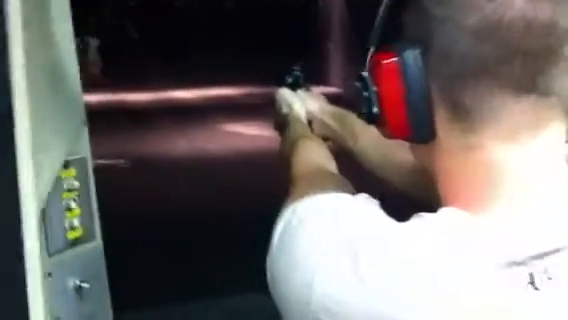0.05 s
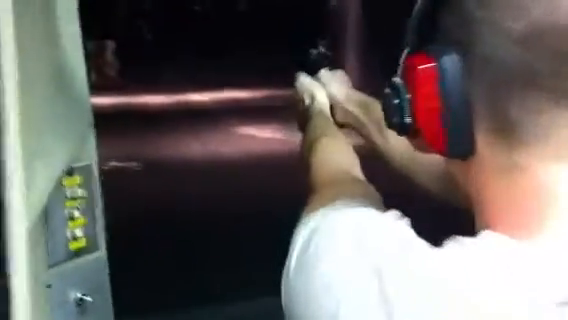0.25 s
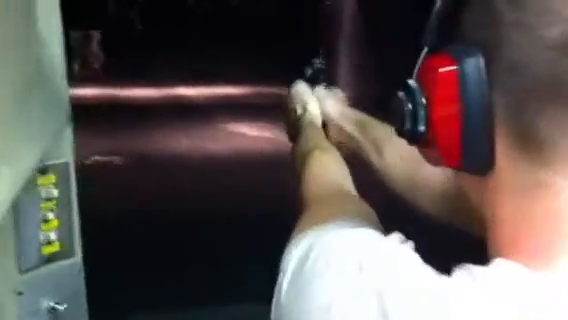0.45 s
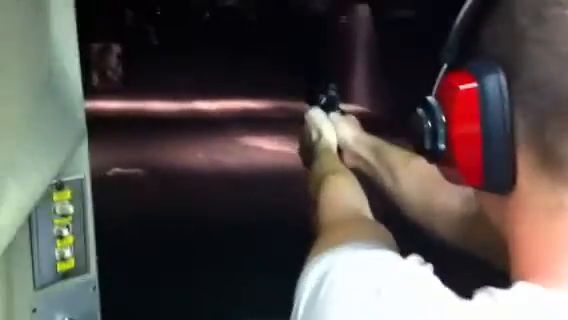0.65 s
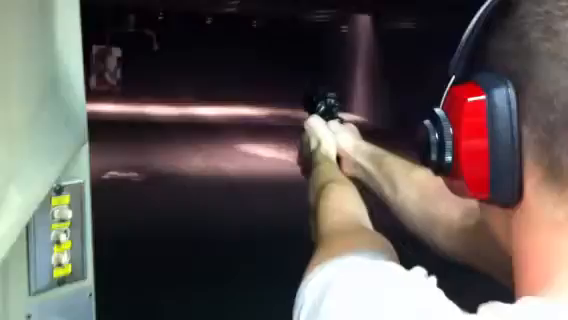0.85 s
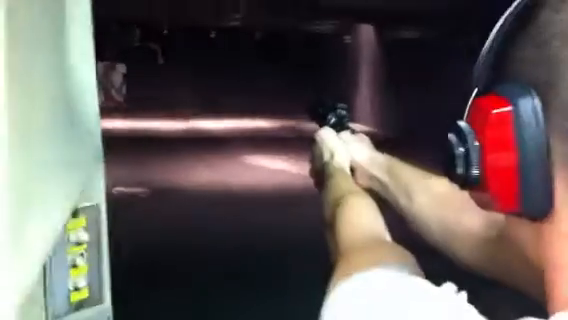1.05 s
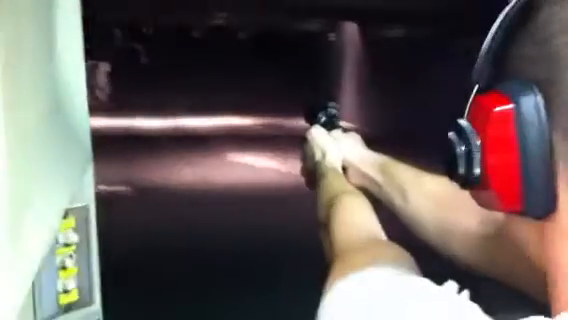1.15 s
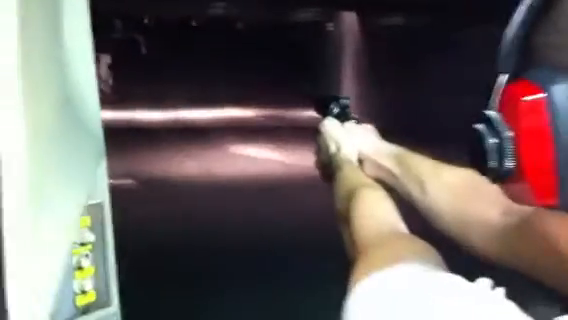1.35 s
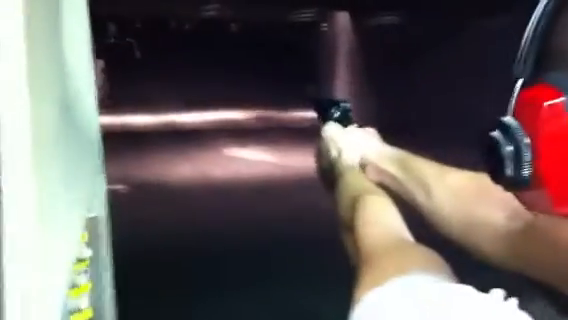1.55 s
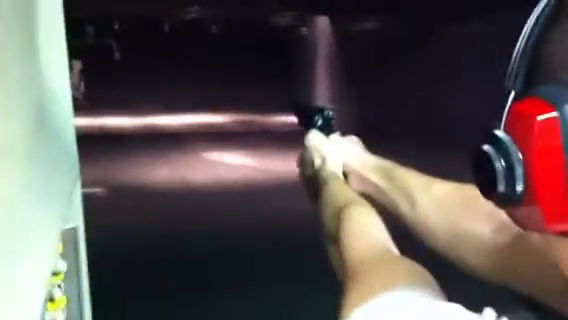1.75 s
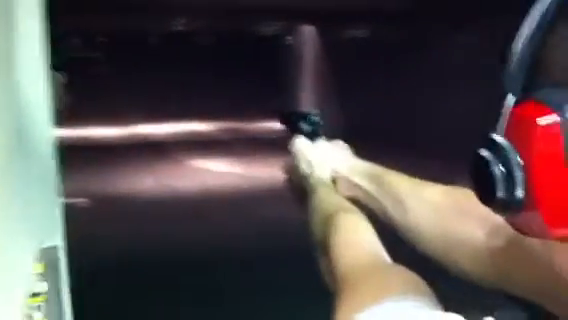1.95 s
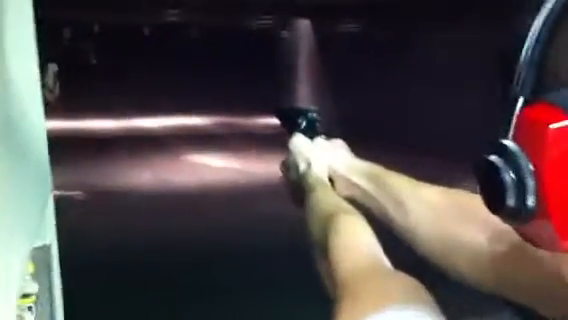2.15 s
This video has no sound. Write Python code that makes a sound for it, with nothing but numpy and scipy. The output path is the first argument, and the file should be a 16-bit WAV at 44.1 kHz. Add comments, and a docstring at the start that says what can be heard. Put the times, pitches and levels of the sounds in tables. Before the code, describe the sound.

A single loud handgun shot cracks in an indoor concrete firing range, its echo ringing away slowly.

```python
"""One handgun shot in a long concrete firing range, heard by a phone behind the shooter's shoulder.
The hum of the ventilation, filtered noise, runs throughout. The action clicks: short noise and steel tones.
The muzzle blast is a pressure step that overloads the microphone; the hall answers with bands of fading
noise, the far wall returns the sound, and the ringing dies away from the treble down.
The spent case then jingles faintly, made of narrow noise bands, with a soft rustle near the end."""
import sys
import numpy as np
from scipy import signal
from scipy.fft import rfft, irfft
from scipy.io import wavfile

SR = 44100
rng = np.random.default_rng(int(sys.argv[2]) if len(sys.argv) > 2 else 0)


def gain_from_db(level_db):
    """Turn a decibel level (scalar or array-like) into a linear amplitude factor."""
    decades = np.asarray(level_db, float) / 20
    return 10 ** decades


def pcm_store(signal):
    """Save signal as 16-bit PCM."""
    levels = np.round(np.clip(np.atleast_2d(signal), -1, 1) * 32767)
    wavfile.write(sys.argv[1], SR, levels.astype(np.int16).T)


N = 97020  # 2.2 s
T = np.arange(N) / SR  # time of each sample in seconds
F = np.arange(N // 2 + 1) * SR / N + 1e-3  # frequencies in Hz, kept just above zero for the logarithms
SHOT_S = .2425  # moment of the shot


def unit(x):
    """Scale to rms 1."""
    return x / np.sqrt(np.mean(x ** 2))


def coloured(gain):
    """Fresh noise with this gain at each frequency, rms 1."""
    return unit(irfft(rfft(rng.standard_normal(N)) * gain, N))


def resonance(hz, width_hz):
    """Gain of a peak around one frequency: 1 at its centre, half at the edges of its width."""
    return 1 / (1 + (2 * (F - hz) / width_hz) ** 2)


def decay(t, t60):
    """Falls 60 dB in t60 seconds (at least 5 ms) from t = 0, silent before."""
    return (t >= 0) * gain_from_db(-60 * np.maximum(t, 0) / max(t60, .005))


def walk(rate_hz):
    """Random wander with rms 1, slower than about rate_hz."""
    return coloured(1 / (1 + (F / rate_hz) ** 4))


def ring(start, modes):
    """Decaying sines struck at one moment, each with a chance phase and strength."""
    scatter_db = 3  # a mode is weaker than its table level by anything up to this
    out = 0
    for (hz, db, t60), (luck, phase) in zip(modes, rng.random((len(modes), 2))):
        level = gain_from_db(db + scatter_db * (luck - 1.0))
        out = out + level * decay(T - start, t60) * np.sin(2 * np.pi * (hz * (T - start) + phase))
    return out


# How the air noise is spread over pitch.
# Each row: frequency in Hz, relative level in dB per Hz.
AIR_SPECTRUM = [(25, -21.5), (45, -17), (75, -11.5), (150, -9), (330, -4.5), (420, -12.5), (950, -18.5),
                (1500, -25), (3000, -32), (8000, -39), (16000, -42)]
# Wavering tones of the fans.
# Each row: frequency in Hz, width in Hz, rms level in dB before the common swell.
FAN_TONES = [(121, 18, -62.5), (149.3, 24, -59), (195, 20, -64.5), (311, 30, -58)]


def ventilation():
    """Broad air noise and narrow fan tones; the whole swells a little."""
    swell = gain_from_db(1.5 * walk(4))
    hz, db = np.array(AIR_SPECTRUM).T
    mix = gain_from_db(-56.5) * coloured(gain_from_db(np.interp(np.log(F), np.log(hz), db)))
    for hz, width_hz, db in FAN_TONES:
        mix = mix + gain_from_db(db) * coloured(resonance(hz, width_hz))
    return swell * mix


def rustle():
    """A soft bright rustle: noise of uneven level that starts at once and then fades."""
    start_s, length_s, level_db = 1.725, .17, -67
    u = np.clip((T - start_s) / length_s, 0, 1)  # runs from 0 to 1 over the rustle
    level = gain_from_db(level_db + 1.6 * walk(40))
    noise = coloured(F / (F + 5000) / (1 + (F / 11000) ** 4))
    return level * (u > 0) * (1 - u ** 3) * noise


# Landings of the spent case.
# Each row: time in seconds, level in dB, frequency in Hz that this landing excites most.
LANDINGS = [(.96, -85, 11600), (1.13, -82, 10500), (1.2, -71, 9600), (1.33, -78, 7200), (1.46, -70.5, 8900),
            (1.53, -76, 11400), (1.62, -82, 12300), (1.71, -76, 12200), (1.78, -75, 6200),
            (1.95, -77, 9720)]
# Tones of the brass case.
# Each row: frequency in Hz, relative level in dB, time to fall 60 dB in seconds.
BRASS_MODES = [(5900, -1, .4), (6400, 0, 0.24), (6858, -5, .5), (7187, -5, 0.76), (8080, -10, .7),
               (9800, -2, 0.44), (10900, -9, .3), (12000, -1, .5), (12387, -4, .5), (14007, -17, .3)]


def case():
    """The rolling brass case shimmers in narrow noise bands; each landing excites its own range of them."""
    reach_octaves, wobble_hz = .4, 30  # distance at which a mode is 12 dB weaker; blur of each tone
    out = 0
    for mode_hz, mode_db, t60 in BRASS_MODES:
        struck = 0
        for start, db, hz in LANDINGS:
            distance = np.log2(mode_hz / hz) / reach_octaves
            struck = struck + gain_from_db(db - 12 * distance ** 2) * decay(T - start, t60)
        out = out + gain_from_db(mode_db) * struck * coloured(resonance(mode_hz, wobble_hz))
    return out


# Clicks of the action.
# Each row: time in seconds, level in dB, time for the rattle to fall 60 dB in seconds,
# seconds until the click is damped.
CLICKS = [(.191, -44, .2, .023), (.2195, -42, .3, .012), (.231, -24, .04, .006), (.2405, -22, .03, .003)]
# Tones of the steel.
# Each row: frequency in Hz, relative level in dB, time to fall 60 dB in seconds.
STEEL_MODES = [(1535, -1.5, 0.042), (3900, -11.5, 0.05), (7100, -9.5, 0.069), (9100, -3, 0.11),
               (12300, -3.5, .2)]


def action():
    """Each click: a rattle of noise and the ring of the steel, damped when the next part closes on it."""
    rattle_db, damped_t60_s = -0.5, .008
    rattle = gain_from_db(rattle_db) * coloured(F / (F + 1500) / (1 + (F / 14000) ** 8))
    out = 0
    for start, db, t60, stop in CLICKS:
        click = rattle * decay(T - start, t60) + ring(start, STEEL_MODES)
        damping = decay(np.maximum(T - start - stop, 0), damped_t60_s)
        out = out + gain_from_db(db) * click * damping
    return out


# Tones of the hall that come up slowly and linger.
# Each row: frequency in Hz, relative level in dB, time to fall 60 dB in seconds.
LINGERING_MODES = [(114, -13, 1.9), (450.8, -11.5, 2), (507, -14.5, 2.4), (557, -10, 2.0),
                   (594, -15.5, 2.4), (620, -17.5, 2.1), (645, -15, 1.3), (713.5, 4, 1.5), (1069, -6, 1.5),
                   (710, -9.5, 1.7), (899, -18.5, 1.5), (1250, -18.5, 1.9)]


def lingering():
    """Modes of the hall: sines that decay from the shot under a slow rise, with a wavering level."""
    rise_s = .5
    rise = (1 - np.exp(-np.maximum(T - SHOT_S, 0) / rise_s)) ** 2
    return ring(SHOT_S, LINGERING_MODES) * rise * gain_from_db(1.2 * walk(5.2))


def far_wall(t, band_hz):
    """Gain of the far wall's answer: a swell and fade after the round trip, mostly in the higher bands."""
    round_trip_s, rise_s, fade_s = .118, .015, .025
    lift_db, lowest_hz = 8, 1500  # strength of the swell; bands below this frequency get little of it
    since = np.maximum(t - round_trip_s, 0)
    back = (1 - np.exp(-since / rise_s)) * np.exp(-since / fade_s)
    return 1 + gain_from_db(lift_db) * back / (1 + (lowest_hz / band_hz) ** 2)


# The hall's answer to the blast.
# Each row: frequency in Hz, relative level in dB, build-up in seconds, time to fall 60 dB in seconds,
# relative level of the slow tail in dB, time for the tail to fall 60 dB in seconds.
HALL_BANDS = [(75, -39.5, .08, 0.62, -53, 1.2), (116.96, -19, .08, 1.1, -43, 2.0),
              (255.4, -9.5, .07, 1.266, -36, 0.89), (478, -2.5, 0.11, 1.285, -25.5, 2.7),
              (765, -2.5, 0.017, 1.057, -17, 2.4), (1100, -4, 0.07, 0.93, -28.5, 2.79),
              (1319, -5.5, .025, .85, -28.5, 2.2), (1680, -7.5, 0.0078, 0.88, -28, 2.63),
              (2304, -9.5, 0.0072, 0.81, -33, 2.75), (3500, -11, .005, 0.79, -37, 2.76),
              (5000, -10.5, .002, 0.71, -35, 2.12), (8000, -15, .0005, 0.65, -45, 1.5),
              (12220, -10.5, 0.00065, .38, -58, 2.1), (16200, -14.5, .0003, .3, -65.5, 1.3)]
# Resonances of booth and hall that colour the reflections.
# Each row: frequency in Hz, width in Hz, boost in dB (a cut if negative).
HALL_RESONANCES = [(183, 14, 9), (280, 20, 6.5), (373, 42, 3.5), (402, 9, 5), (455, 39, 6.5),
                   (527, 48, 3.5), (609.6, 16, 5.5), (653, 5.3, 1.5), (700, 12, -3.5), (744, 21, 3),
                   (1070, 19, -0.5), (1380, 150, -1.5), (2031, 12, -0.5), (2360, 12, 3.5),
                   (2747, 6.7, 10.5), (3890, 14, 8.5), (4728, 14, 7), (4900, 710, 1.5)]


def hall():
    """Dense reflections as quarter-octave noise bands that build up, then decay on two slopes."""
    first_db = -18.5  # share of each band that is there from the first instant
    flutter_hz, flutter_db = 23.3, -0.64  # echoes beating across the hall
    t = np.maximum(T - SHOT_S, 0)
    rows = np.array(HALL_BANDS)
    colour = 1 + sum((gain_from_db(db) - 1) * resonance(hz, width_hz) for hz, width_hz, db in HALL_RESONANCES)
    out = 0
    for octave in np.arange(6.25, 14.1, .25):  # band centre is 2 ** octave Hz
        columns = rows[:, 1:].T
        db, rise, t60, slow_db, slow_t60 = (np.interp(octave, np.log2(rows[:, 0]), c) for c in columns)
        # neighbouring bands overlap so that their powers add up evenly
        share = np.cos(2 * np.pi * np.clip(np.log2(F) - octave, -.25, .25))
        band = irfft(rfft(rng.standard_normal(N)) * share * colour, N) / np.sqrt(np.mean(share ** 2))
        fade = np.hypot(gain_from_db(db) * decay(t, t60), gain_from_db(slow_db) * decay(t, slow_t60))
        build_up = gain_from_db(first_db) + (1 - np.exp(-t / max(rise, 1e-4))) ** 4
        out = out + band * fade * build_up * (T >= SHOT_S) * far_wall(t, 2 ** octave)
    out = out + lingering()
    flutter = flutter_db * np.cos(2 * np.pi * flutter_hz * t + 4.5)
    return out * gain_from_db(-5.5 + flutter)


def blast():
    """N-shaped pressure step at the muzzle: a sudden rise, then a fall through zero into suction."""
    length_s, peak_db = .00012, -3  # time until the pressure crosses zero; height of the step
    u = (T - SHOT_S) / length_s
    return gain_from_db(peak_db) * (u >= 0) * (1 - u) * np.exp(-np.clip(u, 0, 50))


def scene():
    """All sources at the phone, in one channel."""
    shot = blast() + hall()
    gun = action()
    floor = rustle() + case()
    return (shot + gun + floor + ventilation())[None]


def band_limit(x):
    """A steep low-pass at the top of the band."""
    return signal.sosfilt(signal.butter(12, 16620, fs=SR, output="sos"), x)


def record(dry):
    """The microphone loses the deep bass, overloads with a firm knee and loses the top."""
    low_hz, top_hz = 95, 15600
    clip_level, knee = .71, 6.0  # ceiling of the overload; higher knee = sharper bend
    x = signal.sosfilt(signal.butter(2, low_hz, "high", fs=SR, output="sos"), dry)
    x = x / (1 + np.abs(x / clip_level) ** knee) ** (1 / knee)
    x = signal.sosfiltfilt(signal.ellip(6, .1, 35, top_hz, fs=SR, output="sos"), x)
    return band_limit(x)


dry = scene()
out = record(dry)
pcm_store(out)
```